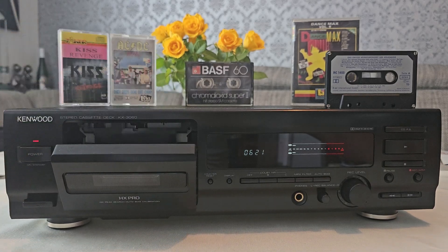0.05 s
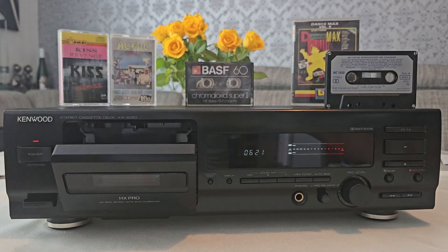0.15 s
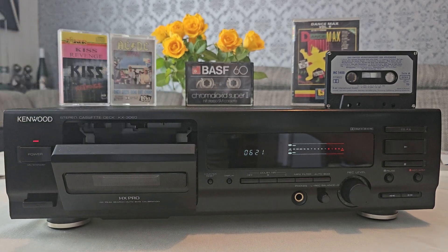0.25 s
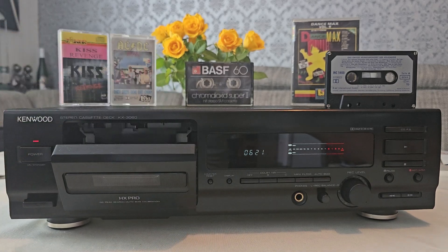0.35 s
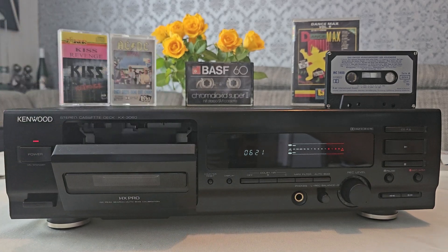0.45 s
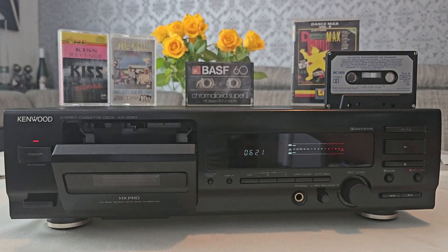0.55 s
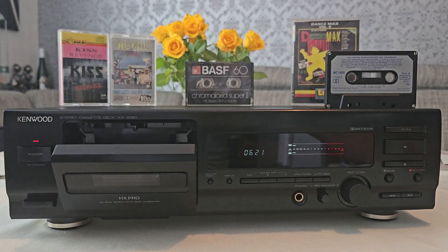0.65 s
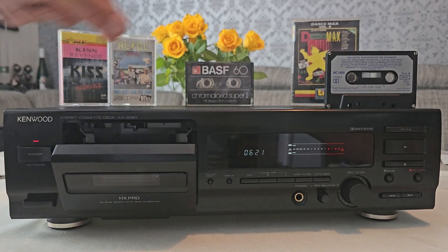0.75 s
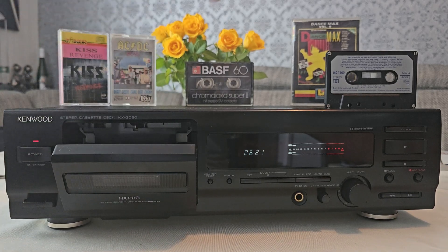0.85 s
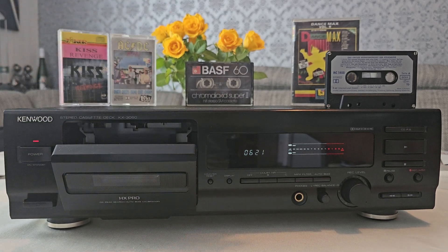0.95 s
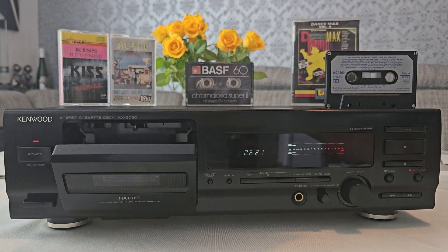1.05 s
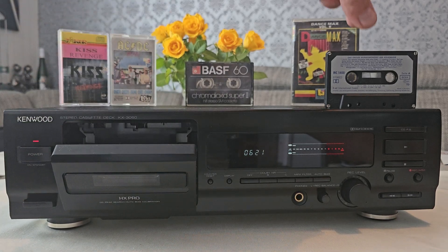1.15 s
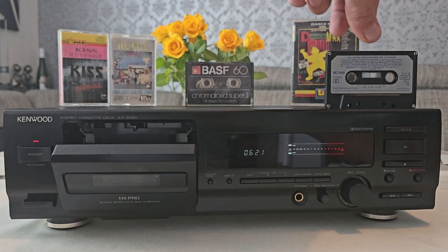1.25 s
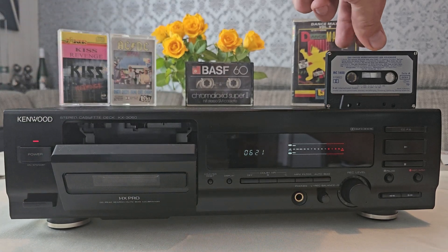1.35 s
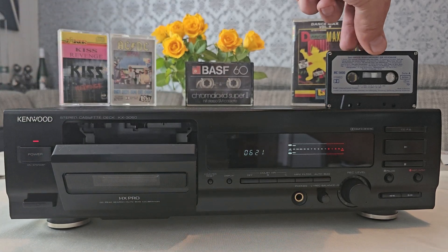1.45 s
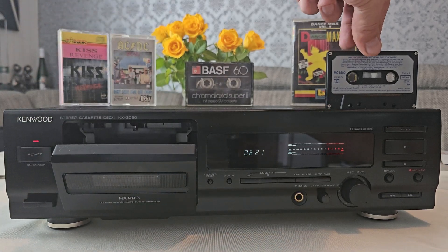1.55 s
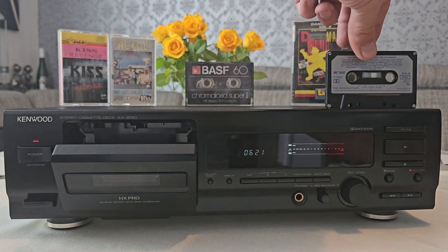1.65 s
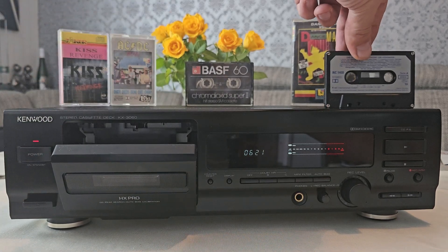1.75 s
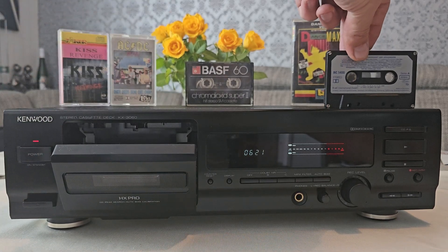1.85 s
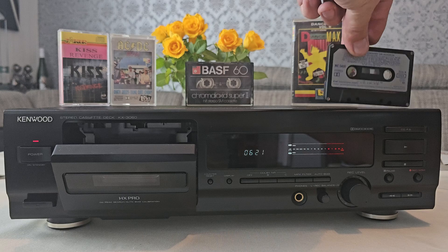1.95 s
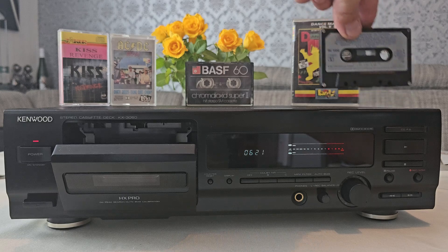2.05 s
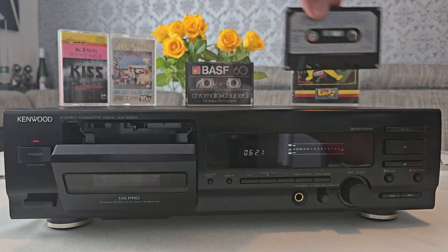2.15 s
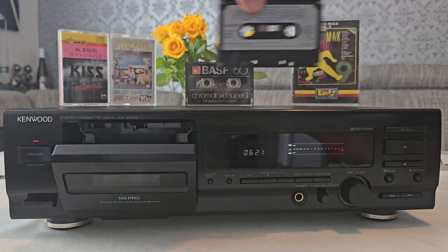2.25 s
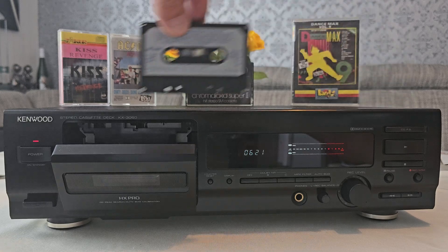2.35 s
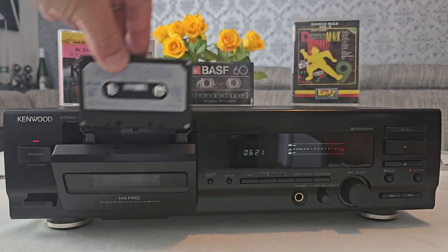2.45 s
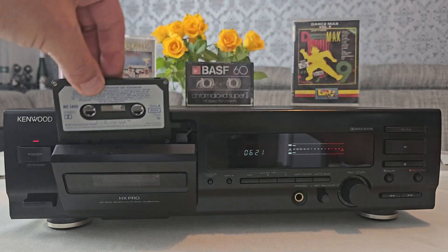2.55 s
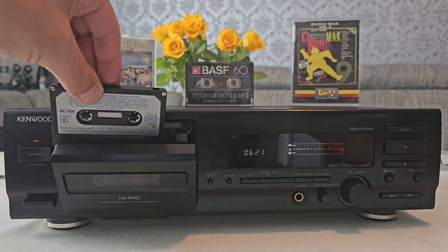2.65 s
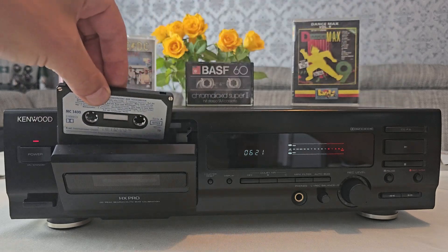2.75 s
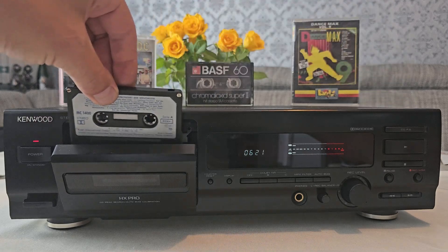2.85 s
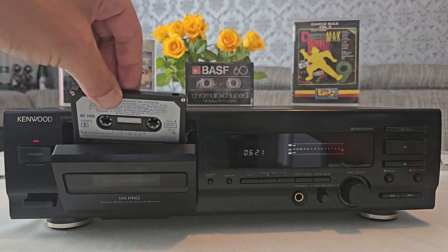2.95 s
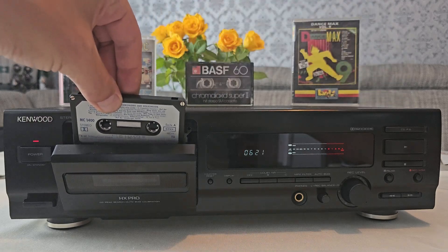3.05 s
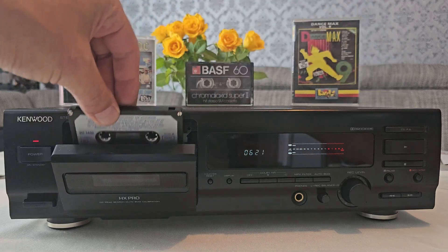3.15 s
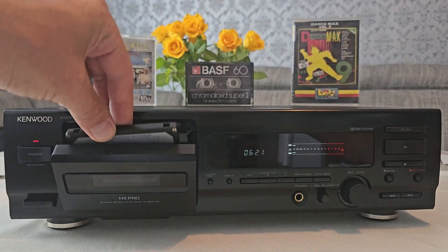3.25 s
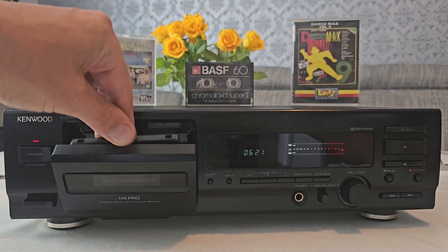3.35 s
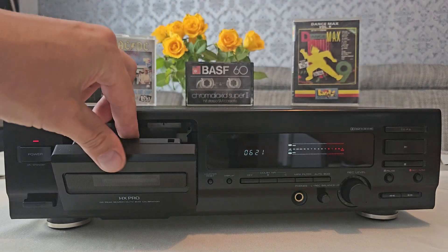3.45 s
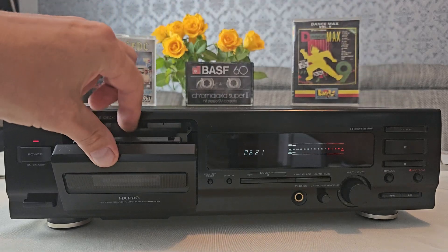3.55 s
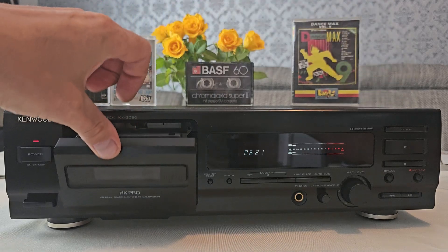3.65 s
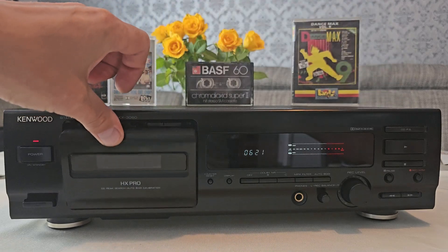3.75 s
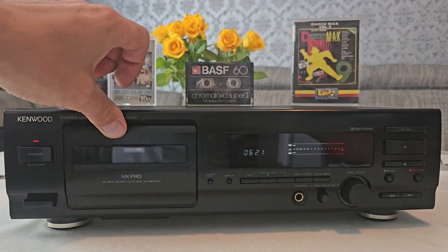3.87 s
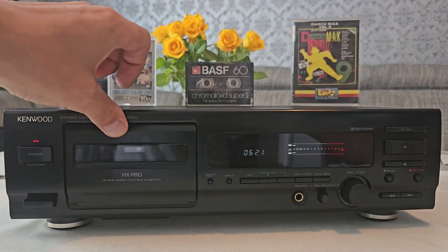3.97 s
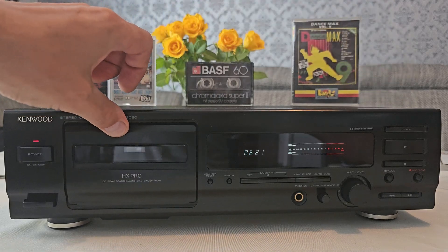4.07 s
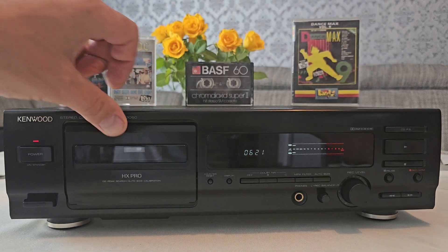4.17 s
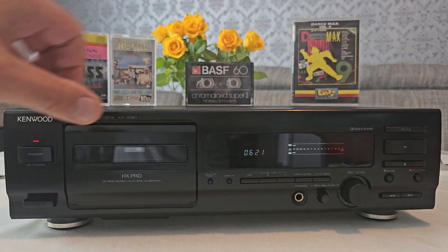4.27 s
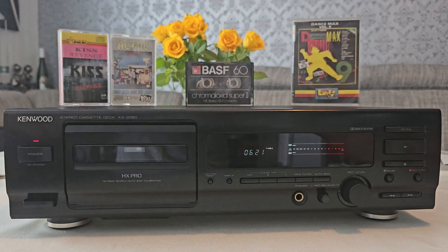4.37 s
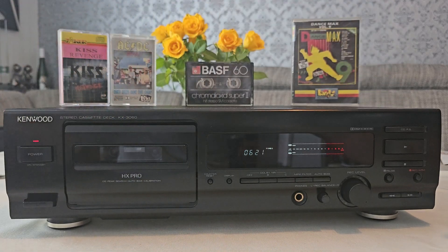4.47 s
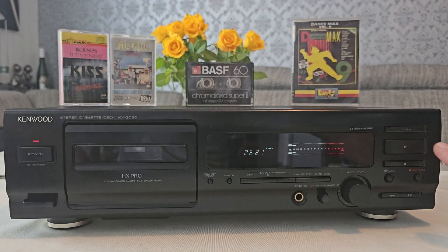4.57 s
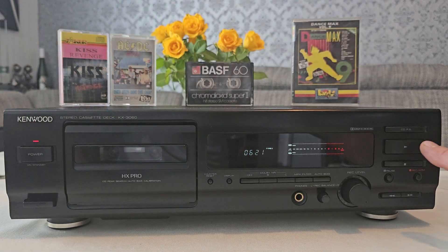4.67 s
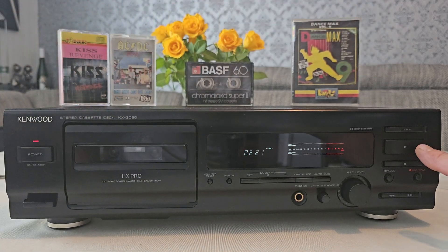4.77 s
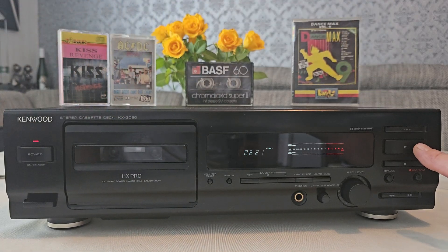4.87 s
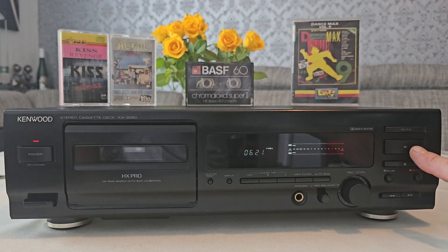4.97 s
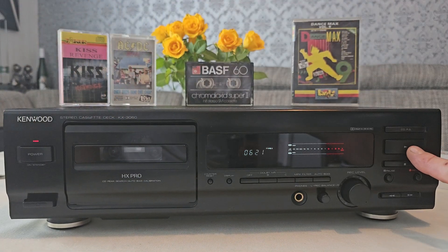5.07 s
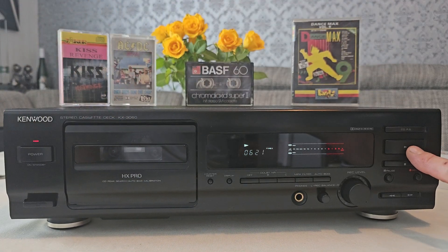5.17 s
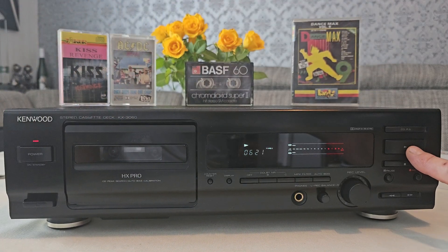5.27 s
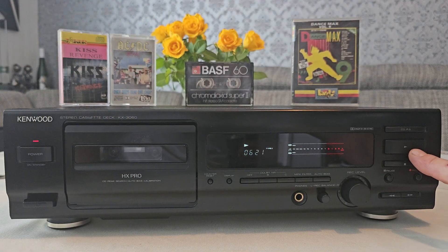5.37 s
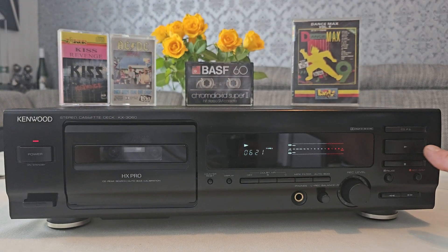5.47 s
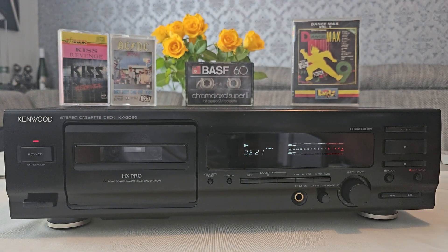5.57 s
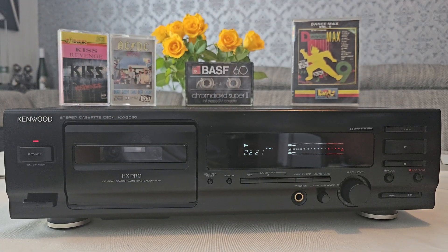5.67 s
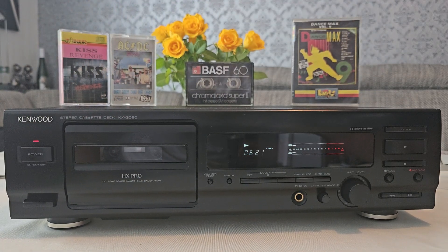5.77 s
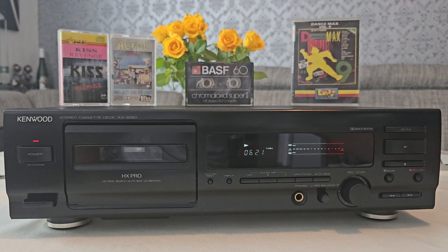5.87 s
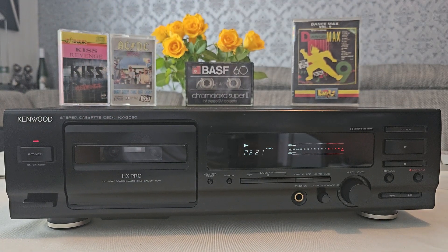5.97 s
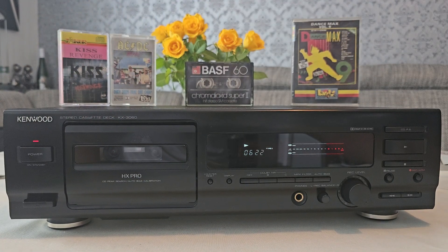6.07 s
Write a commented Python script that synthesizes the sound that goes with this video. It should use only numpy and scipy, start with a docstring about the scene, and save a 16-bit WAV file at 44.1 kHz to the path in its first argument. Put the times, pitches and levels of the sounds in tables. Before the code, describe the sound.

In a small quiet room, an empty plastic case clacks and rattles on a table to the left. Soft drags and taps follow as a cassette is lifted. It knocks and scrapes into the deck's open door, which shuts with a loud, hard snap. A key clicks with a short springy ring, then the transport clicks, whirs faintly and clunks. Close stereo microphone, low room hum.

```python
"""An empty plastic cassette case clacks down to the left of a tape deck, in a small quiet room.
A cassette drags and taps as it is lifted off the deck's lid, then scrapes into the open door, which snaps shut.
The play key clicks and rings, the transport clunks, its motor whirs and the heads knock into place.
Blows are short noise bursts through resonances, friction is grainy noise, gears are random ticks.
Low room noise, a wavering hum and a faint hiss lie underneath; the walls add a diffuse tail."""
import sys
import numpy as np
from scipy import signal
from scipy.fft import rfft, irfft, next_fast_len
from scipy.io import wavfile
from scipy.ndimage import uniform_filter1d

SR = 44100
rng = np.random.default_rng(int(sys.argv[2]) if len(sys.argv) > 2 else 0)


def int16_out(signal):
    """Quantize to a 16-bit WAV file."""
    q = np.round(np.clip(np.atleast_2d(signal).T, -1, 1) * 32767)
    wavfile.write(sys.argv[1], SR, q.astype(np.int16))


N = 269884
HIT = SR // 4  # samples in one blow

# resonances of the deck's front panel and door: (f/Hz, width/Hz, level/dB)
PANEL_MODES = [(486, 100, -15), (778, 74, -9), (1316, 61, 7), (1445, 130, -12.5), (1630, 57, -18),
               (2202, 140, -20)]
# resonances of the steel box on its table: (f/Hz, width/Hz, level/dB)
CHASSIS_MODES = [(107, 23, -8.5), (185.4, 36, -4), (253, 78, 0), (309.5, 100, -1), (395, 360, -9.5)]
# colour of the sharpest part of a contact: (f/Hz, level/dB)
EDGE_COLOUR = [(4000, -28.5), (7000, 0.5), (9500, -5), (12000, -5.5), (15000, -8), (16500, -5.5)]
# colour of the dragging cassette: (f/Hz, level/dB)
DRAG_COLOUR = [(180, -33), (300, 2), (365, -27), (489, 3), (706, -33), (804, 2), (999, -30), (1250, -12.5),
               (4000, -63), (5200, -79), (8800, -120)]
# left-right likeness of direct sound: (f/Hz, likeness from 0 to 1)
NEAR_ALIKE = [(200, 1), (1300, 0.8), (3500, 0.06), (10000, .3)]
# left-right likeness of diffuse sound: (f/Hz, likeness from 0 to 1)
ROOM_ALIKE = [(100, 0.93), (290, 0.52), (640, 0.44), (1400, 0.12)]


def amp(db):
    """Decibels to gain."""
    return 10 ** (np.asarray(db) / 20)


def unit(x):
    """x at rms 1."""
    return x / np.sqrt(np.mean(x ** 2) + 1e-20)


def loudest(x):
    """x scaled so that its loudest 4 ms have rms 1."""
    power = np.mean(np.atleast_2d(x) ** 2, 0)
    return x / np.sqrt(uniform_filter1d(power, size=176).max())


def along(points, hz):
    """(f/Hz, value) points read on a log frequency axis."""
    f, value = np.transpose(points)
    return np.interp(np.log(hz + 1), np.log(f + 1), value)


def gains(rows):
    """One gain per sample for each dB column, silent outside the rows."""
    s, *columns = np.transpose(rows)
    return [np.interp(np.arange(N) / SR, s, amp(c), left=0, right=0) for c in columns]


def strokes(rows, attack, release):
    """A gain that swells up to each (t/s, length/s, level/dB) row, holds and dies away; time constants in s."""
    t = np.arange(N) / SR
    total = 0
    for s, length, db in rows:
        swell = np.minimum(t - s, 0) / attack
        decay = np.maximum(t - s - length, 0) / release
        total = total + amp(db) * np.exp(swell - decay)
    return total


def filtered(x, response):
    """x times a complex response of frequency."""
    n = x.shape[-1]
    m = 2 * next_fast_len(n // 2 + 4096)  # room for the response to ring out
    return irfft(rfft(x, m) * response(np.fft.rfftfreq(m, 1 / SR)), m)[..., :n]


def colour(points):
    """The causal, minimum-phase response with these (f/Hz, level/dB) points."""
    def response(hz):
        cepstrum = irfft(np.log(amp(along(points, hz)) + 1e-6))
        half = len(cepstrum) // 2
        cepstrum[1:half] *= 2
        cepstrum[half + 1:] = 0
        return np.exp(rfft(cepstrum))
    return response


def body(modes, spread_db=0):
    """Resonances in parallel; each point of contact excites them in other shares."""
    shares = amp(spread_db * rng.standard_normal(len(modes)))

    def response(f):
        total = 0
        for k, (centre, width, db) in enumerate(modes):
            resonance = 1j * f * width / (centre * centre - f * f + 1j * f * width)
            total = total + (-1) ** k * shares[k] * amp(db) * resonance
        return total
    return response


def heavy(modes, corner_hz):
    """A massive body passes little above its resonances."""
    response = body(modes)
    return lambda f: response(f) / (1 + 1j * f / corner_hz) ** 2


def noise(alike, size):
    """Stereo white noise whose sides are alike by frequency."""
    def mid_and_side(hz):
        turn = np.arccos(np.clip(along(alike, hz), -1, 1)) / 2
        return np.array([np.cos(turn), np.sin(turn)])
    mid, side = filtered(rng.standard_normal((2, size)), mid_and_side)
    return np.array([mid + side, mid - side])


def placed(x, lead_ms, pan_db):
    """Positive lead reaches the left microphone sooner; positive pan is louder there, above all in the treble."""
    sides = np.array([[1], [-1]]) / 2

    def response(hz):
        # the recorder's body shades the far microphone; the pan is as given near 3 kHz
        shade = ((hz + 1) / 3000) ** 0.4
        return amp(sides * pan_db * shade) * np.exp(2j * np.pi * hz * sides * lead_ms / 1000)
    return filtered(x, response)


def add(track, s, sound):
    """Mix a sound into the track at s seconds."""
    part = track[:, max(round(s * SR), 0):][:, :sound.shape[-1]]
    part += sound[..., :part.shape[1]]


def contact(response, rise, t60):
    """A short chatter of surfaces, heard through a body; rise and t60 in s."""
    t = np.arange(HIT) / SR
    force = (1 - np.exp(-(t / rise) ** 2)) * amp(-60 * t / t60)
    return loudest(filtered(force * noise(NEAR_ALIKE, HIT), response))


def struck(response):
    """One clean push, heard through a body that starts to swing 1.5 ms after the surfaces meet."""
    push = np.eye(1, HIT, round(0.0015 * SR))
    return loudest(filtered(push, response))


def click(db, bright_db):
    """A contact rings the front panel; the harder the surfaces, the more crack and edge it has."""
    # colour of hard contact in the door: (f/Hz, level/dB)
    crack_colour = [(1300, -16.5), (2100, 0), (2500, -6.5), (3150, -1), (3600, -1.5), (4000, -2),
                    (5300, -6.5), (7000, -14.5), (10000, -29)]
    crack_share = 0.53  # how much of the brightness goes into the crack; the edge gets all of it
    push = amp(-5.5) * struck(body(PANEL_MODES, spread_db=0.5))
    chatter = amp(-6.5) * contact(body(PANEL_MODES, spread_db=2), rise=0.0012, t60=0.035)
    crack = amp(crack_share * bright_db - 1.37) * contact(colour(crack_colour), rise=0.00047, t60=0.07)
    edge = amp(bright_db - 2.0) * contact(colour(EDGE_COLOUR), rise=0.0054, t60=0.026)
    return amp(db) * (push + chatter + crack + edge)


def rubbing(response, grain_db, grain_rate):
    """Friction: noise that catches and slips in small grains, grain_rate of them a second."""
    knots = rng.standard_normal(int(N * grain_rate / SR) + 4)
    wander = np.interp(np.arange(N) * grain_rate / SR, np.arange(len(knots)), knots)
    grip = amp(grain_db * wander)
    return unit(filtered(grip * noise(NEAR_ALIKE, N), response))


def slips(response, rate, spread_db):
    """Single ticks at random moments, rate a second, where an edge jumps over the roughness."""
    sizes = amp(spread_db * np.clip(rng.standard_normal((2, N)), -2, 2))
    ticks = (rng.random(N) < rate / SR) * sizes
    return unit(filtered(ticks, response))


def deck():
    """Every contact clicks, thuds in the chassis and rebounds lightly on the panel; soft bumps only thud."""
    # contacts in the door and the transport: (t/s, strength/dB, brightness/dB)
    contacts = [(2.658, -42.5, -30), (2.686, -37, -34), (2.723, -45, -30), (2.882, -33.5, -43),
                (2.944, -35.5, -13.5), (2.961, -29, -12), (2.994, -39, -13), (3.082, -48.5, -21),
                (3.234, -49, -3), (3.266, -47.5, 2), (3.285, -42.5, -9), (3.332, -38.5, -21),
                (3.4533, -29, -15.5), (3.482, -22, -23), (3.614, -47, -17), (3.7025, -35.5, -15),
                (3.868, -30, -44), (3.907, -35, -14.5), (3.927, -26.5, -24.5), (3.953, -26, -27.5),
                (3.975, -31, -18.5), (3.988, -11.5, -7.5), (4.794, -60.5, -4.5), (5.417, -44, -40),
                (5.512, -48, 6.5), (5.52, -30.5, 0.5), (5.53, -24.5, -39), (5.576, -33.5, -8.5),
                (5.701, -50, -32.5), (5.909, -50, -30.5), (6.018, -51.5, -25), (6.107, -26.5, -7.5)]
    # dull bumps from the hand, the door and the head carriage: (t/s, level/dB)
    bumps = [(2.666, -43), (2.709, -41), (2.996, -40), (3.06, -43), (3.321, -46.5), (3.501, -31.5),
             (4.134, -30), (6.108, -27.5)]
    out, box = np.zeros((2, 2, N))
    for s, db, bright_db in contacts:
        add(out, s, click(db, bright_db))
        thud = contact(heavy(CHASSIS_MODES, corner_hz=1200), rise=0.00081, t60=0.24)
        add(box, s, amp(db - 16) * thud)
        flight = 0.018 * (0.5 + rng.random())  # s before a loose part falls back, once
        rebound = contact(body(PANEL_MODES, spread_db=6), rise=0.0011, t60=0.027)
        add(out, s + flight, amp(db - 15.5) * rebound)
    for s, db in bumps:
        add(box, s, amp(db) * contact(heavy(CHASSIS_MODES, corner_hz=900), rise=0.004, t60=0.093))
    return placed(out, lead_ms=0.12, pan_db=1.0) + box


def key():
    """The key knocks on its stop in the panel and its spring rings on, differently when pressed and let go."""
    # the play key goes down and comes back: (t/s, ring/dB, knock/dB, brightness/dB)
    presses = [(5.187, -30, -30, -46), (5.381, -47.5, -30, -33)]
    # spring and front plate as the key goes down: (f/Hz, level/dB, t60/s)
    down_modes = [(799, -18, 0.22), (1480, -32, 0.7), (1432, -3, 0.066), (1757, 1, 0.045),
                  (1730, -32, 0.17), (2160, -14, 0.079), (2700, -17.5, 0.057), (3900, -31, 0.13)]
    # spring and front plate as the key comes back: (f/Hz, level/dB, t60/s)
    up_modes = [(426, 1.5, 0.28), (1170, 10.5, 0.13), (3800, -11, 0.29), (3950, -4, 0.15), (9000, 2, 0.056)]
    out, t = np.zeros((2, N)), np.arange(HIT) / SR
    for (s, ring_db, knock_db, bright_db), modes in zip(presses, (down_modes, up_modes)):
        ring = sum(amp(db - 60 * t / t60) * np.sin(2 * np.pi * hz * t) for hz, db, t60 in modes)
        add(out, s, amp(ring_db) * loudest(ring) + click(knock_db, bright_db))
    return out


def slide():
    """The shell rubs and ticks along the guides, which shake the panel and the chassis."""
    # strokes down the door's guides: (t/s, length/s, strength/dB, scratchiness/dB on top of the strength)
    pushes = [(2.672, 0.02, -50, -17), (2.803, 0.027, -63, -46), (2.886, 0.096, -51.5, -13.5),
              (3.105, 0.26, -66, -5), (3.29, .16, -52, -7.5), (3.88, .1, -65.5, -11.5)]
    # resonances of the cassette's shell when rubbed: (f/Hz, width/Hz, level/dB)
    scratch_modes = [(2140, 130, 1.5), (2800, 150, -9.5), (3220, 180, -0.5), (4650, 220, -0.5),
                     (6200, 500, -7), (8000, 1500, -13.5), (13000, 4000, -13)]
    attack, release = 0.011, 0.05  # s
    panel = strokes([(s, length, db) for s, length, db, _ in pushes], attack, release)
    scratch_rows = [(s, length, db + scratch_db) for s, length, db, scratch_db in pushes]
    scratch = strokes(scratch_rows, attack, release)
    out = amp(-4) * panel * slips(body(PANEL_MODES), rate=280, spread_db=2.5)
    out += amp(-2.5) * panel * rubbing(colour(DRAG_COLOUR), grain_db=7.5, grain_rate=70)
    out += panel * rubbing(heavy(CHASSIS_MODES, corner_hz=1193), grain_db=3, grain_rate=87)
    for hz, width, db in scratch_modes:  # each resonance swells and fades as the point of contact moves
        rub = rubbing(body([(hz, width, 0)]), grain_db=0.5, grain_rate=51)
        out += amp(db - 7.5) * scratch * rub
    out += amp(-12) * scratch * slips(body(scratch_modes), rate=110, spread_db=13)
    return placed(out, lead_ms=0.08, pan_db=3.5)


def lift():
    """Damped by the fingers, the cassette drags and taps dully on the lid, which rumbles."""
    # the cassette drags on the lid: (t/s, length/s, level/dB)
    drags = [(1.53, 0.029, -64), (1.675, 0.025, -59.5), (1.82, 0.064, -71), (1.91, 0.1, -57.5),
             (2.01, 0.039, -53)]
    # it taps the lid and shifts in the fingers: (t/s, strength/dB, brightness/dB)
    taps = [(1.495, -73, -4), (1.537, -61, -7), (1.625, -64.5, -22), (1.676, -65, -31), (1.907, -55, -9.5),
            (2.012, -47, -12), (2.047, -58, 6), (2.084, -65.5, 1), (2.395, -53.5, -12)]
    # resonances of the deck's lid: (f/Hz, width/Hz, level/dB)
    lid_modes = [(519.3, 61, 4), (746, 330, -1), (1270, 160, 1.5)]
    # colour of the cassette held in the fingers: (f/Hz, level/dB)
    tick_colour = [(700, -9), (1250, 8.5), (2100, 6), (3000, -13.5), (4000, -28), (7000, -48)]
    rumble_modes = [(100, 35, 0), (240, 120, -8)]  # (f/Hz, width/Hz, level/dB)
    drag = strokes(drags, attack=0.015, release=0.02)
    rub = rubbing(colour(DRAG_COLOUR), grain_db=4, grain_rate=200)
    rumble = rubbing(heavy(rumble_modes, corner_hz=500), grain_db=3, grain_rate=80)
    out = drag * (amp(-1.5) * rub + amp(-5.5) * rumble)
    for s, db, bright_db in taps:
        add(out, s, amp(db + 0.5) * contact(heavy(lid_modes, corner_hz=2000), rise=0.0017, t60=0.046))
        add(out, s, amp(db + bright_db) * contact(colour(tick_colour), rise=0.001, t60=0.04))
    return placed(out, lead_ms=-0.094, pan_db=3.7)


def case():
    """Thin plastic clacks with a sharp edge; the table booms under it. Light touches are mostly edge."""
    # the case hits the table and rattles: (t/s, strength/dB, weight on the table/dB)
    blows = [(0.066, -21.5, -5), (0.0699, -21.5, 3.5), (0.133, -34, 3.5), (0.195, -42, -4),
             (0.276, -40.5, -3), (0.3363, -20, 1), (0.3672, -34, 0.5), (0.5274, -19.5, -6.5)]
    # resonances of the hollow case: (f/Hz, width/Hz, level/dB)
    shell_modes = [(470, 23, -2), (690, 150, 4.5), (882, 110, 3), (1280, 150, 2.5), (1760, 200, -2)]
    # resonances of the table under it: (f/Hz, width/Hz, level/dB)
    table_modes = [(111, 140, -9.5), (241, 46, 0.5), (338, 150, -15)]
    # colour of the case's hard corners: (f/Hz, level/dB)
    clack_colour = [(1300, -27.5), (2050, 0.5), (2500, -3), (3300, -3), (4000, -1.5), (5200, -1),
                    (6200, -4), (9000, -31)]
    full_blow_db = -18  # a blow that rings the whole case
    body_fade = 0.55  # dB that the body loses against the edge for each dB below a full blow
    out, table = np.zeros((2, 2, N))
    for s, db, weight_db in blows:
        body_db = db + body_fade * min(db - full_blow_db, 0)
        edge = contact(colour(EDGE_COLOUR), rise=0.0011, t60=0.024)
        shell = contact(body(shell_modes, spread_db=0.5), rise=0.0014, t60=0.027)
        boom = contact(body(table_modes), rise=0.00097, t60=0.073)
        clack = contact(colour(clack_colour), rise=0.00059, t60=0.02)
        add(out, s, amp(db - 2.5) * edge)
        add(out, s, amp(body_db + 1) * shell)
        add(table, s, amp(body_db + weight_db - 7.5) * boom)
        add(out, s, amp(body_db + 1.92) * clack)
        for delay in 0.026 * rng.random(size=3):  # the loose lid chatters within 26 ms
            rattle = contact(colour(clack_colour), rise=0.00055, t60=0.0053)
            add(out, s + delay, amp(body_db - 15.5) * rattle)
    return placed(out, lead_ms=0.36, pan_db=3.5) + table


def motor():
    """The running gears hum in the chassis and tick lightly."""
    # the motor's course: (t/s, hum/dB, whir/dB)
    course = [(5.56, -58, -64.5), (5.928, -57.5, -67), (6.12, -48, -54.5)]
    # resonances of the running transport: (f/Hz, width/Hz, level/dB)
    gear_modes = [(517, 113, -5), (770, 100, -4), (1308, 88, 3.5), (2020, 250, -45)]
    hum_modes = [(158, 40, -14), (236, 13, 3), (267, 44, -11)]  # (f/Hz, width/Hz, level/dB)
    hum, whir = gains(course)
    box = rubbing(heavy(hum_modes, corner_hz=900), grain_db=3, grain_rate=130)
    teeth = slips(body(gear_modes), rate=600, spread_db=1)
    return amp(-2) * hum * box + amp(-2.5) * whir * teeth


def background():
    """Low room noise, a hum of narrow noise bands that wavers, and a faint high hiss that swells and fades."""
    # colour of the still room: (f/Hz, level/dB)
    air_colour = [(12, -35), (20, -10), (63, -3.5), (119, -14.5), (164, -3), (191, -10.5), (264, -3),
                  (331, -11.5), (405, -27), (508, -20), (1100, -36), (1220, -30), (1350, -34), (4170, -38),
                  (8000, -57.5), (10400, -86.5), (17600, -120)]
    # hum bands: (f/Hz, level/dB)
    hum_bands = [(26.9, -76.5), (53.8, -69.5), (166.9, -74), (279.9, -71)]
    # swells of the hiss: (t/s, length/s, level/dB)
    hiss_swells = [(3.27, .13, -69.5), (4.42, 0.22, -73.5), (5.61, 0.25, -71.5)]
    # colour of the hiss: (f/Hz, level/dB)
    hiss_colour = [(3000, -28.5), (6000, 0), (8000, -4.5), (12000, -1.5), (15500, -4.5)]
    air = amp(-62) * unit(filtered(noise(ROOM_ALIKE, N), colour(air_colour)))
    hum = 0
    for hz, db in hum_bands:
        hum = hum + amp(db) * unit(filtered(rng.standard_normal(N), body([(hz, 3, 0)])))
    swell = amp(-100.5) + strokes(hiss_swells, attack=0.05, release=0.11)
    hiss = swell * unit(filtered(noise(ROOM_ALIKE, N), colour(hiss_colour)))
    return air + hum + hiss


def room(x):
    """The walls answer with a diffuse tail in which the highest treble dies first."""
    # decay time of the room: (f/Hz, t60/s)
    decay_times = [(100, .36), (300, .34), (1000, .32), (4000, .35), (9000, .32), (16000, .27)]
    hz, t, bins = signal.stft(noise(ROOM_ALIKE, SR // 2), SR, nperseg=256)
    decay = amp(-60 * t / along(decay_times, hz)[:, None])
    tail = signal.istft(bins * decay, SR, nperseg=256)[1]
    tail *= 1 - np.exp(-np.arange(tail.shape[1]) / SR / 0.004)  # builds up over some 4 ms
    return signal.fftconvolve(x, tail / np.linalg.norm(tail[0]), axes=1)[:, :N]


def scene():
    """The case lies farther off than the deck, so it has more room around it."""
    near = deck() + key() + slide() + lift() + motor()
    far = case()
    return near + amp(-12) * room(near) + far + amp(-7.5) * room(far) + background()


def record(dry):
    """The microphone ports colour the treble; the recorder clips at full scale and has a band limit."""
    # the ports ring a little: (f/Hz, level/dB)
    port_colour = [(10300, 1), (11400, 5.5), (12300, 3)]
    top_hz = 15900
    heard = np.clip(filtered(dry, colour(port_colour)), -1, 1)
    return filtered(heard, lambda hz: 1 / np.sqrt(1 + (hz / top_hz) ** 300))


dry = scene()
out = record(dry)
int16_out(out)
```